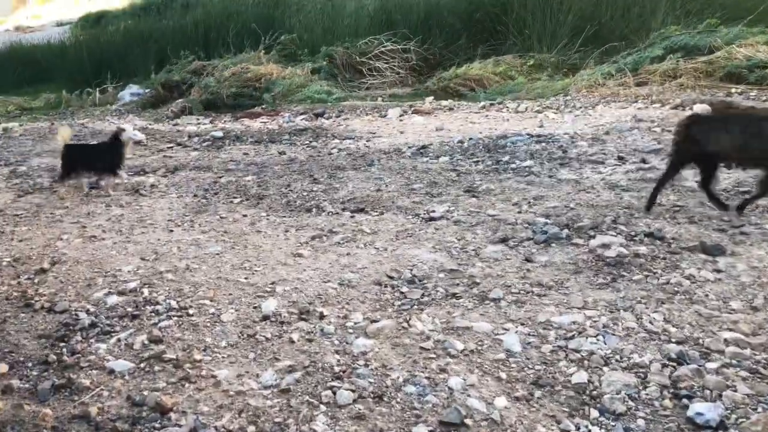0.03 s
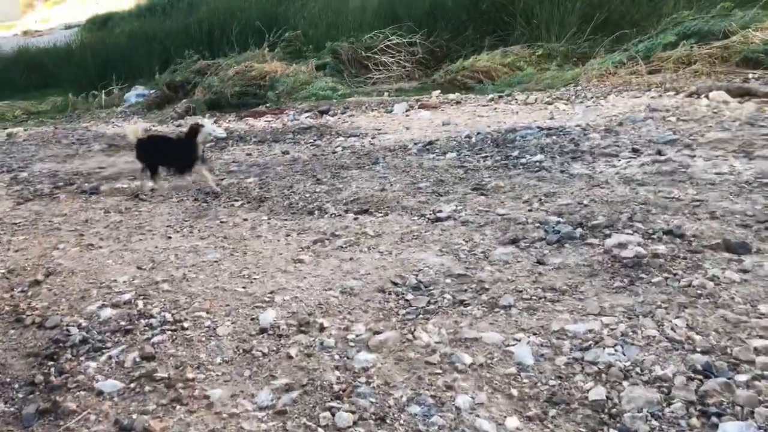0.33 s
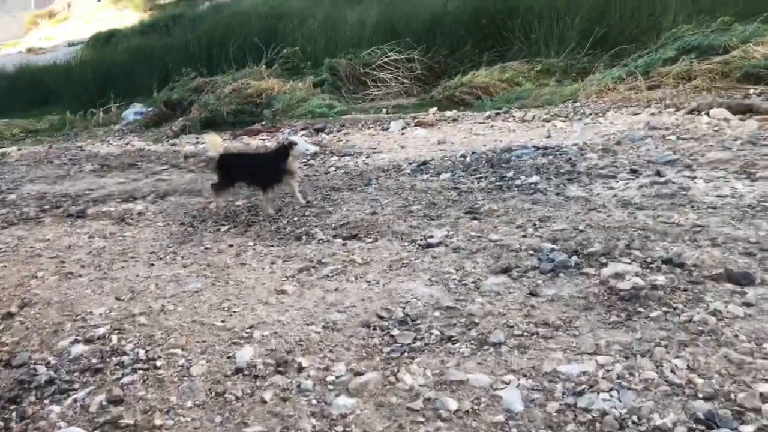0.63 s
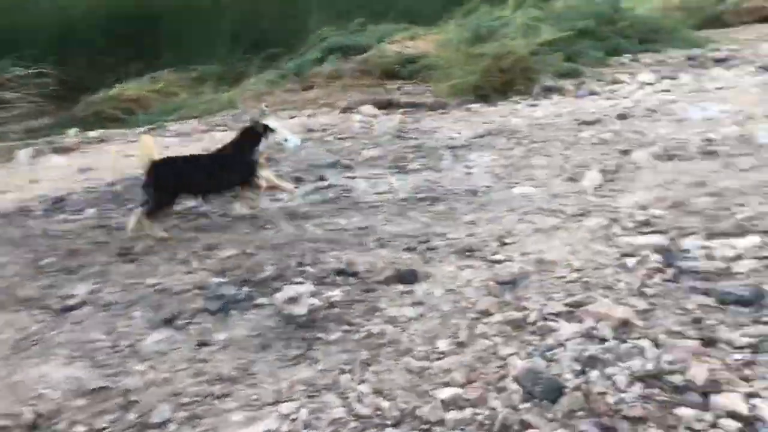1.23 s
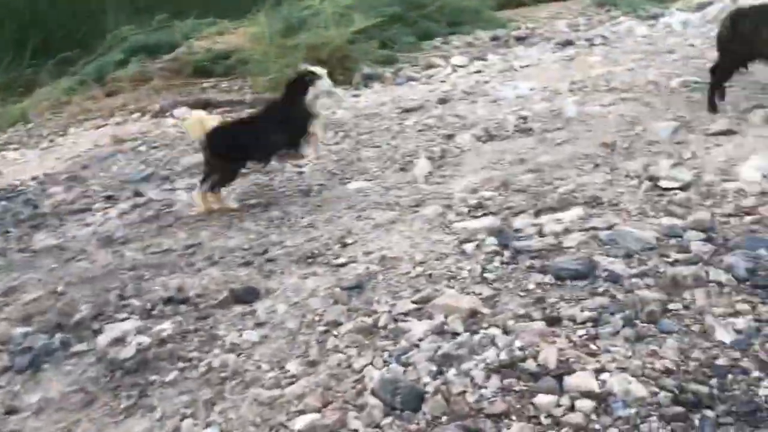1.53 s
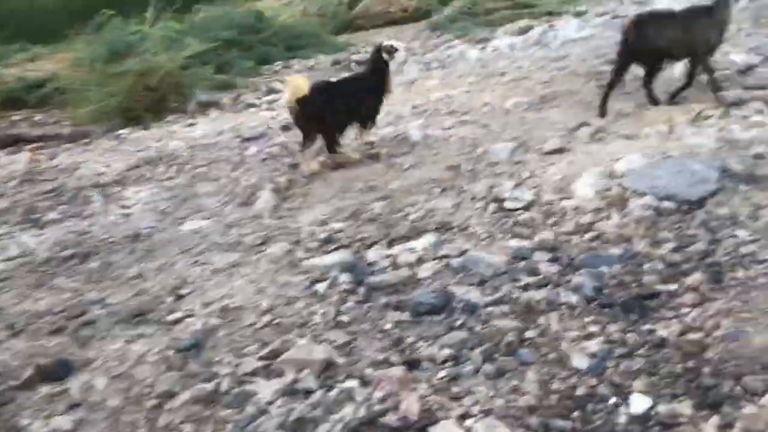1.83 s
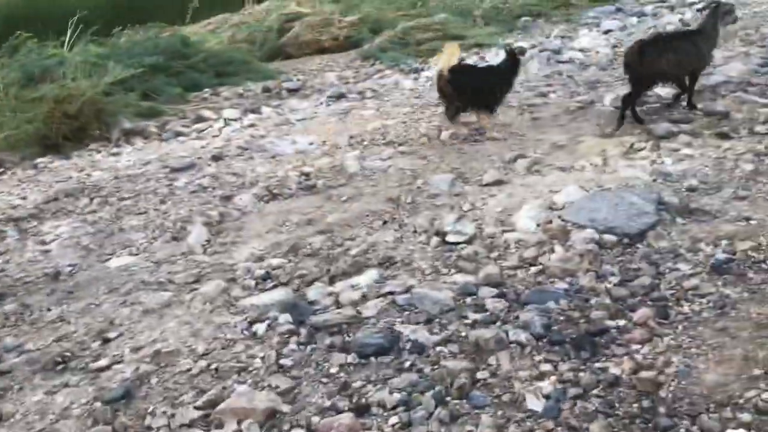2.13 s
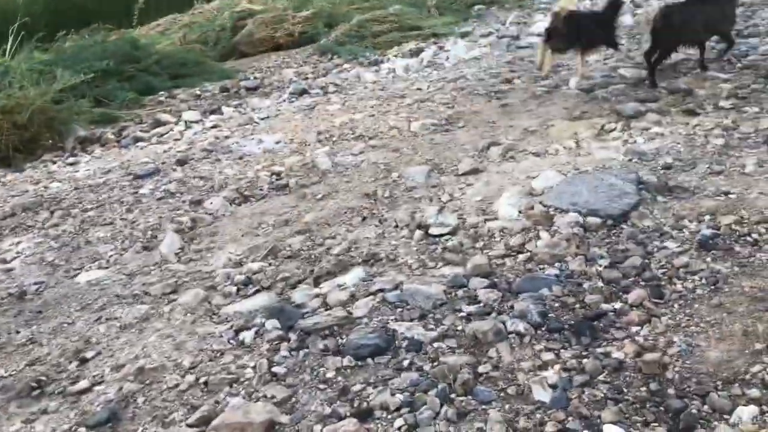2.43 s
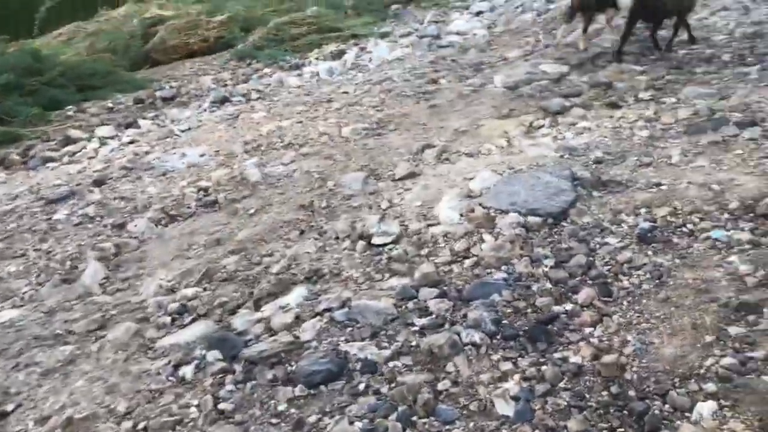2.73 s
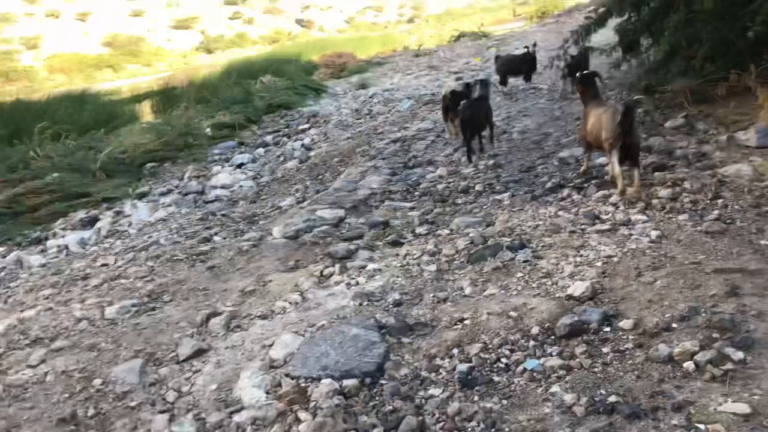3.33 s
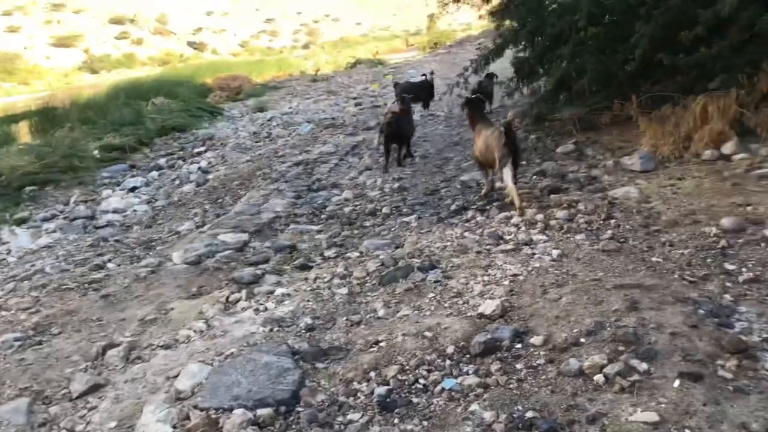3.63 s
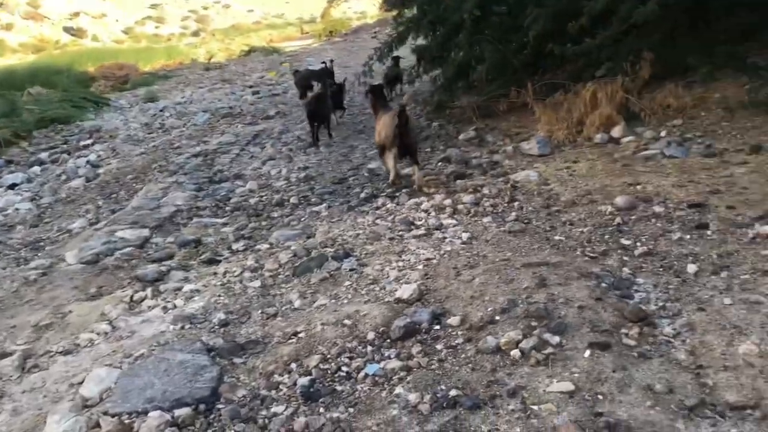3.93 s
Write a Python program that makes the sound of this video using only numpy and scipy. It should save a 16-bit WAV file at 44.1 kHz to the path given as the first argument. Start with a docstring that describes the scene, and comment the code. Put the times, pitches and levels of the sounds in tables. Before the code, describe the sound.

Hooves of running goats click and crunch on loose stones outdoors, sparse at first under gusts on the microphone. The wind then eases, leaving nearby scrapes, knocks and soft thuds. A small bird chirps very faintly.

```python
"""Goats running over gravel

A few metres away, hooves flick pebbles together, crunch and scrape over dry, loose gravel and knock
on bedded stones; the heavier steps thud. Wind buffets the microphone, mostly in the first half.
A small bird chirps over a distant rush, a faint hiss and an insect-like shimmer."""
import sys
import numpy as np
from scipy import signal
from scipy.fft import rfft, irfft
from scipy.io import wavfile
from scipy.ndimage import uniform_filter1d

SR = 44100
rng = np.random.default_rng(int(sys.argv[2]) if len(sys.argv) > 2 else 0)


def wrap_up_sound(samples):
    """Save the sound to the file named by the first command line argument, as 16-bit audio."""
    columns = np.atleast_2d(samples).T
    # keep every value between -1 and 1, then stretch to whole-number steps
    tamed = np.clip(columns, -1, 1)
    steps = np.round(tamed * 32767).astype(np.int16)
    wavfile.write(sys.argv[1], SR, steps)


N = 176400


def pebble_clicks():
    """Pebbles collide: rough faces grind, crack and rattle, and that ragged contact rings the stone."""
    # Each row: time in seconds, relative level in dB, lowest mode in Hz, trim on the crack in dB.
    clicks = [(.052, -49, 3830, 0.5), (.206, -38, 3960, -7), (0.274, -38, 3430, -12), (.347, -35, 4600, -7),
              (.387, -38.5, 3540, -30), (.504, -43.5, 3500, -4), (.516, -44, 4100, -9),
              (.564, -49.5, 4760, -4.5), (.715, -45, 4400, -7), (.943, -54.5, 3550, 0),
              (1.209, -35.5, 2700, -14.5), (1.271, -38, 3000, -13.5), (1.297, -56.5, 5060, 3),
              (1.303, -53, 4440, 5.5), (1.348, -50.5, 3880, 4), (1.415, -50, 2980, -2),
              (1.45, -46.5, 3400, -3.5), (1.5617, -31, 4450, -16), (1.612, -33, 4550, -11),
              (1.617, -48, 4200, 0.5), (1.6603, -43.5, 5270, -3.5), (1.6948, -27, 2880, -10.5),
              (1.711, -35.5, 4800, -9.5), (1.7682, -27.5, 3740, -10), (1.855, -35, 2490, -18.5),
              (2.25, -38.5, 3330, -7.5), (2.509, -36, 3000, -20.5), (2.965, -40, 3830, -8),
              (2.984, -37, 3800, -7), (3.067, -52.5, 3670, 3), (3.182, -43.5, 2870, -7),
              (3.714, -62, 4400, 1), (3.925, -46.5, 3340, -4.5)]
    # A pebble's ring. Each row: ratio to the lowest mode, relative level in dB, T60 in seconds.
    pebble_modes = [(1, 0, .011), (1.15, -4, .008), (1.5, -6, .006)]
    # The crack's bright EQ. Each row: frequency in Hz, relative gain in dB.
    crack_eq = [(1500, -10), (4000, 1), (6500, 0), (11000, -8), (16000, -13)]
    rise_s, crack_s, rattle_s = .0009, .0006, .005
    rings, cracks = np.zeros(N), np.zeros(N)
    t = np.arange(-rattle_s, 10 * rattle_s, 1 / SR)  # the hit peaks at t = 0
    decay = np.exp(-np.abs(t) / crack_s) + undb(-14) * np.exp(-t / rattle_s)
    envelope = np.where(t < 0, np.exp(t / rise_s), decay)
    for hit, db, hz, crack_db in clicks:
        contact = envelope * rng.standard_normal(len(t))
        body = signal.fftconvolve(contact * envelope, ring(t - t[0], hz, pebble_modes))
        add(rings, hit + t[0], undb(db - 6.5) * body / np.abs(body).max())
        add(cracks, hit + t[0], undb(db + crack_db - 3.5) * contact)
    return rings + colour(cracks, crack_eq)


def grit_crunch():
    """Grit crunches under a hoof, each grain size in its own octave; stray grains tick between steps."""
    # Gravel shifting underfoot. Each row: start in seconds, length in seconds, relative level in dB.
    crunches = [(.31, 0.14, -65), (1.14, .22, -65.5), (1.521, .1, -57.5), (1.648, 0.15, -59.5),
                (1.912, 0.03, -60.5), (2.11, 0.05, -65), (2.205, 0.11, -64), (2.56, 0.03, -58),
                (2.975, 0.14, -62.5), (3.352, 0.036, -64), (3.536, 0.039, -56.5), (3.572, 0.081, -59.5),
                (3.683, 0.036, -57.5), (3.775, 0.086, -65), (3.838, 0.081, -67)]
    # The trickle of stray grains. Each row: time in seconds, relative level in dB.
    strays = [(.85, -80), (1.05, -73.5)]
    # The grit's EQ. Each row: frequency in Hz, relative gain in dB.
    grit_eq = [(1200, 1), (3600, 4), (5500, 0), (11000, -10), (16000, -12)]
    load, grit = hoof_pressure(crunches), np.zeros(N)
    grain_s = .0009
    grain_decay = np.exp(-np.arange(SR // 20) / SR / grain_s)
    for low_hz in (1000, 2000, 4000, 8000):
        impacts = load * grains(per_s=450, spread_db=3.2)
        impacts += curve(strays) * grains(per_s=110, spread_db=1.5)
        # Each impact becomes a tiny burst of noise.
        power = np.abs(signal.fftconvolve(impacts ** 2, grain_decay / grain_decay.sum())[:N])
        grit += band(np.sqrt(power) * rng.standard_normal(N), low_hz, 2 * low_hz)
    return colour(grit, grit_eq)


def hoof_scrapes():
    """Hooves drag over larger stones: dense tiny impacts make a midrange rasp."""
    # Each row: start in seconds, length in seconds, peak level in dB.
    scuffs = [(1.652, 0.068, -52), (2.978, .035, -50), (3.178, 0.03, -49), (3.214, 0.02, -50),
              (3.352, 0.043, -52), (3.574, 0.065, -47), (3.772, .03, -55)]
    rasp = band(grains(per_s=900, spread_db=1.0), low_hz=533, high_hz=1240)
    return hoof_pressure(scuffs) * unit(rasp)


def hoof_knocks():
    """Hooves strike firmly bedded stones, which answer with a short, hollow ring."""
    # Each row: start in seconds, relative level in dB, strongest mode in Hz.
    knocks = [(1.657, -41, 1270), (1.686, -44, 1350), (2.481, -38, 695), (2.9966, -33, 773),
              (3.220, -43.5, 1280), (3.416, -43, 427), (3.771, -44.5, 1130), (3.84, -44, 1180)]
    # A stone's ring. Each row: ratio to the strongest mode, relative level in dB, T60 in seconds.
    stone_modes = [(.7, -3.5, 0.014), (1, 7.5, 0.01), (1.24, -8, .016)]
    out, t = np.zeros(N), np.arange(SR // 2) / SR
    rise_s = .0014
    attack = 1 - np.exp(-(t / rise_s) ** 2)
    for start, db, hz in knocks:
        add(out, start, undb(db + 7.5) * ring(t, hz, stone_modes) * attack)
    return out


def ground_thuds():
    """Heavy steps land in the ground as soft thuds that sink in pitch."""
    # Each row: start in seconds, relative level in dB, starting pitch in Hz.
    thuds = [(1.802, -38, 294), (2.526, -39, 257), (2.817, -33, 161), (3.008, -35, 270),
             (3.608, -27.5, 195)]
    rise_s, t60_s, octave_drop_s = .0081, .073, .034
    out, t = np.zeros(N), np.arange(SR // 2) / SR
    envelope = (1 - np.exp(-t / rise_s)) * undb(-60 * t / t60_s)
    for start, db, hz in thuds:
        phase = 2 * np.pi * np.cumsum(hz / (1 + t / octave_drop_s)) / SR
        add(out, start, undb(db + 2) * envelope * np.sin(phase))
    return out


def wind():
    """Eddies on the microphone: a rumble, and a brighter flutter that comes forward in the gusts."""
    # The breeze. Each row: time in seconds, strength in dB.
    breeze = [(0, -48.5), (.25, -42), (.34, -53), (.65, -41), (1.6, -44), (2.1, -50), (2.7, -62),
              (3.15, -71.5), (3.3, -52.5), (3.65, -47), (4, -71)]
    # Gusts on top of it. Each row: start in seconds, length in seconds, strength in dB.
    gusts = [(.128, .05, -37.5), (.40, .14, -40), (.64, .32, -40.5), (.96, .34, -38.5), (1.78, .085, -40),
             (3.885, .05, -46)]
    # EQs of the rumble and the flutter. Each row: frequency in Hz, relative gain in dB.
    rumble_eq = [(28, -49.5), (41, -10), (72, 2), (125, 0), (250, -10), (600, -63.5)]
    flutter_eq = [(105, -7.5), (158, 4.5), (240, -1), (420, -5.5), (1300, -30), (2100, -72.5)]
    power = curve(breeze) ** 2
    for start, length, db in gusts:
        arch = np.abs(np.sin(np.linspace(0, np.pi, int(length * SR)))) ** .17  # steep sides, flat top
        add(power, start, (undb(db) * arch) ** 2)
    strength = np.sqrt(power) / undb(-39.5)  # about 1 in a full gust
    rumble = undb(-43) * strength ** .57 * noise(rumble_eq)
    flutter = undb(-43.5) * strength ** 1.335 * noise(flutter_eq)
    return (rumble + flutter) * waver(per_s=70, depth_db=1.6)


def bird():
    """A small bird's thin whistles rise and level off."""
    # Each row: start in seconds, length in seconds, level in dB, first and last pitch in Hz.
    chirps = [(.015, .1, -73, 3700, 4800), (.655, .055, -77, 4750, 5350), (.782, .1, -69.5, 3950, 5080),
              (2.685, .06, -77, 3950, 4650)]
    out, bend = np.zeros(N), 3.2
    for start, length, db, low_hz, high_hz in chirps:
        progress = np.linspace(0, 1, int(length * SR))
        glide = (1 - np.exp(-bend * progress)) / (1 - np.exp(-bend))
        hz = low_hz + (high_hz - low_hz) * glide
        envelope = np.abs(np.sin(np.pi * progress)) ** .5
        add(out, start, undb(db) * envelope * np.sin(2 * np.pi * np.cumsum(hz) / SR))
    return out


def open_air():
    """The background bed: a distant rush, a faint hiss and a thin, insect-like shimmer."""
    # The rush's slow swell. Each row: time in seconds, level in dB.
    rush_levels = [(0, -55.5), (1.2, -58.5), (1.9, -59), (2.3, -57), (3.25, -54.5), (4, -57)]
    # EQs of the rush and the hiss. Each row: frequency in Hz, relative gain in dB.
    rush_eq = [(250, -2), (620, -8), (980, -0.5), (1200, -10), (1530, -7.5), (2000, -23.5), (3000, -63.5)]
    hiss_eq = [(2000, 3), (3500, 4.5), (5000, -2), (9300, -6), (11000, -14)]
    rush = curve(rush_levels) * noise(rush_eq) * waver(per_s=35, depth_db=1.5)
    shimmer = unit(band(rng.standard_normal(N), low_hz=8570, high_hz=9110))
    hiss = undb(-73.5) * noise(hiss_eq)
    return rush + hiss + undb(-87) * shimmer * waver(per_s=55, depth_db=6)


def hoof_pressure(steps):
    """The envelope of each step's weight: a quick rise and a slower release."""
    load = np.zeros(N)
    for start, length, db in steps:
        progress = np.linspace(0, 1, int(length * SR))
        add(load, start, undb(db + np.interp(progress, [0, .25, 1], [-10, 0, -9])))
    return load


def ring(t, hz, modes, scatter=.04):
    """Damped modes, detuned at random: every stone is shaped a little differently."""
    out = np.zeros(len(t))
    for ratio, db, t60 in modes:
        detune = 1 + scatter * (2 * rng.random() - 1)
        out += undb(db - 60 * t / t60) * np.sin(2 * np.pi * hz * ratio * detune * t)
    return out


def grains(per_s, spread_db):
    """Random tiny impacts, mostly weak and a few strong."""
    sizes = undb(spread_db * np.minimum(rng.exponential(size=N), 4))
    hits = rng.random(N) < per_s / SR
    return unit(hits * sizes * rng.choice([-1, 1], N))


def waver(per_s, depth_db):
    """A gain that wanders at random, rms 1."""
    hold = max(int(SR / per_s), 2)
    steps = np.repeat(rng.standard_normal(N)[:N // hold + 1], hold)[:N]
    return unit(undb(depth_db * unit(uniform_filter1d(steps, hold))))


def noise(eq):
    """Coloured noise of rms 1."""
    return unit(colour(rng.standard_normal(N), eq))


def colour(x, eq):
    """An EQ of unit power gain through points in Hz and dB."""
    size = 2 * N
    hz, db = np.array(eq).T
    log_hz = np.log(np.fft.rfftfreq(size, 1 / SR) + 1)
    gain = unit(undb(np.interp(log_hz, np.log(hz), db)))
    # Minimum phase, so nothing rings ahead of a hit.
    cepstrum = irfft(np.log(gain))
    cepstrum[1:N] *= 2
    cepstrum[N + 1:] = 0
    return irfft(rfft(x, size) * np.exp(rfft(cepstrum)))[:N]


def band(x, low_hz, high_hz):
    """A gentle band-pass."""
    return signal.sosfilt(signal.butter(2, [low_hz, high_hz], "band", fs=SR, output="sos"), x)


def curve(points):
    """A fader ride through points in seconds and dB."""
    times, db = np.array(points).T
    return undb(np.interp(np.arange(N) / SR, times, db))


def add(out, start, sound):
    """Mix a sound in at a start time in seconds."""
    i = max(int(start * SR), 0)
    out[i:i + len(sound)] += sound[:max(N - i, 0)]


def undb(db):
    """Decibels to gain."""
    return 10 ** (np.asarray(db) / 20)


def unit(x):
    """Scale to rms 1."""
    return x / np.sqrt(np.mean(x ** 2) + 1e-20)


def scene():
    """The goats, the wind and the outdoor ambience, mixed in mono."""
    goats = pebble_clicks() + grit_crunch() + hoof_scrapes() + hoof_knocks() + ground_thuds()
    return (goats + wind() + open_air() + bird())[None]


def record(dry):
    """A steep low-pass trims the very top."""
    cutoff_hz = 15900
    return signal.sosfilt(signal.ellip(10, .2, 70, cutoff_hz, fs=SR, output="sos"), dry)


dry = scene()
out = record(dry)
wrap_up_sound(out)
```